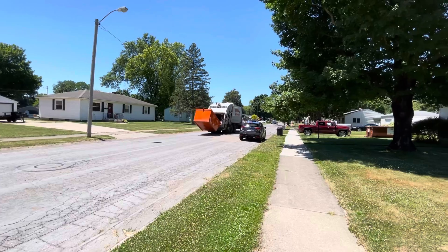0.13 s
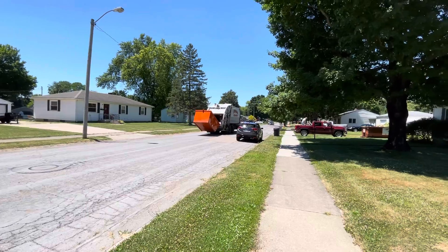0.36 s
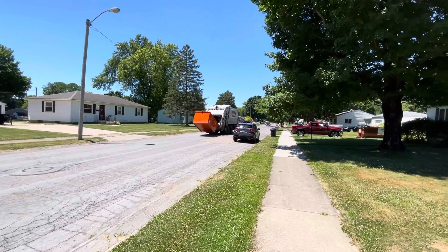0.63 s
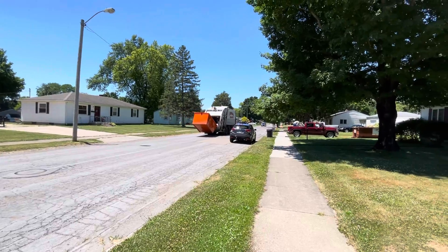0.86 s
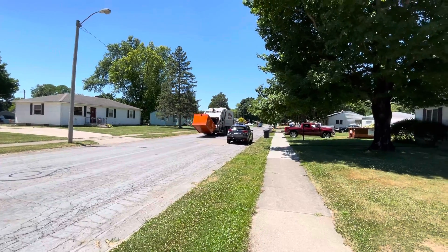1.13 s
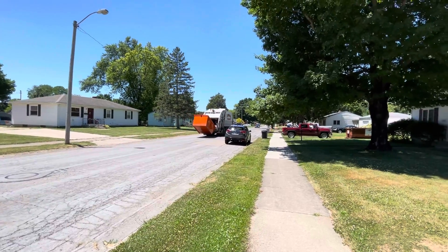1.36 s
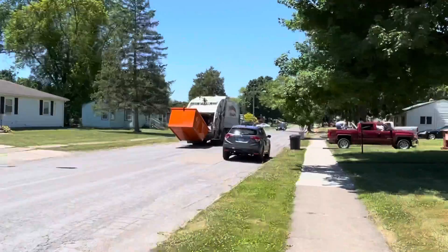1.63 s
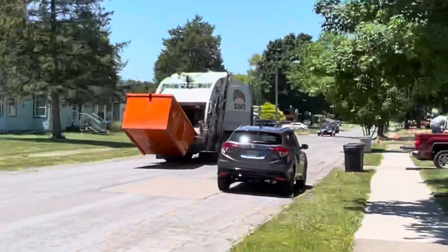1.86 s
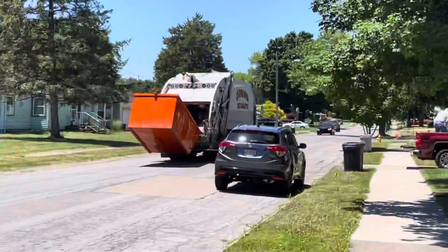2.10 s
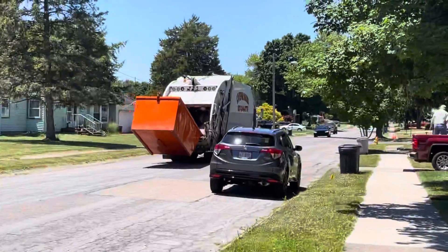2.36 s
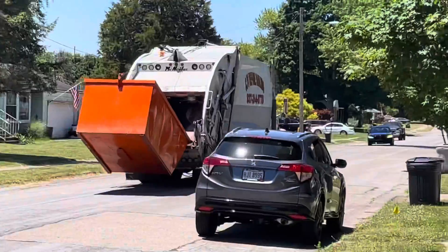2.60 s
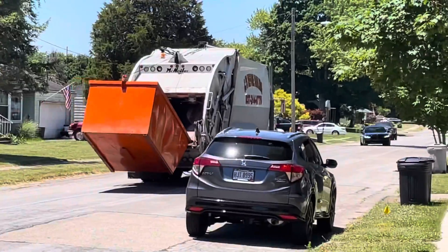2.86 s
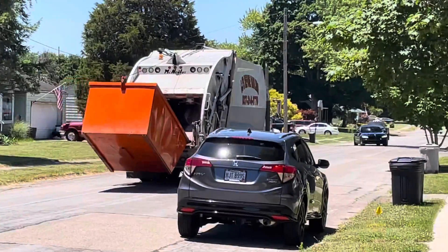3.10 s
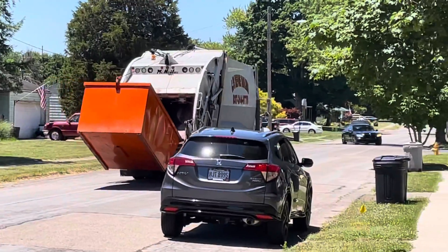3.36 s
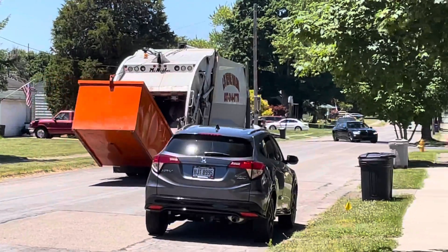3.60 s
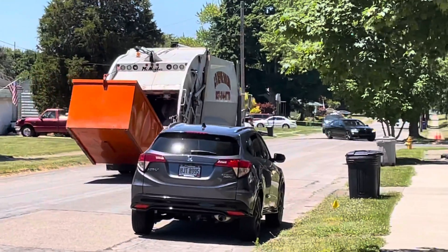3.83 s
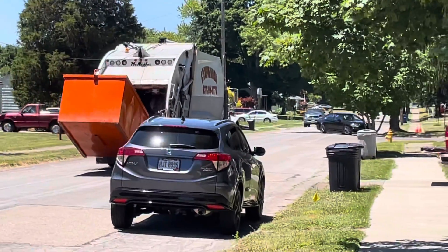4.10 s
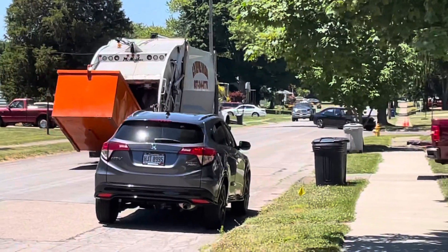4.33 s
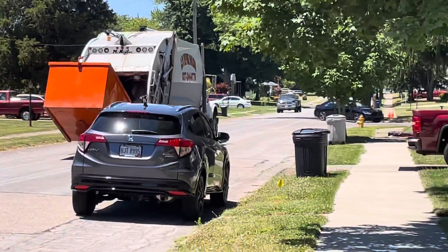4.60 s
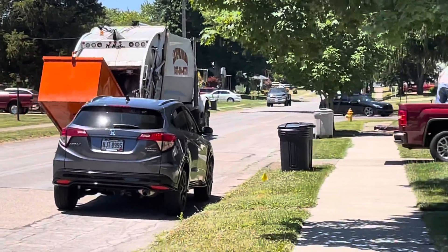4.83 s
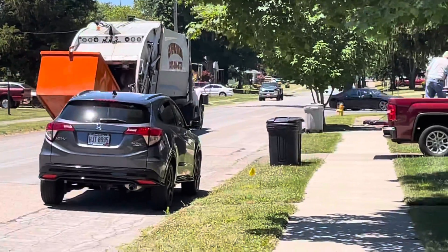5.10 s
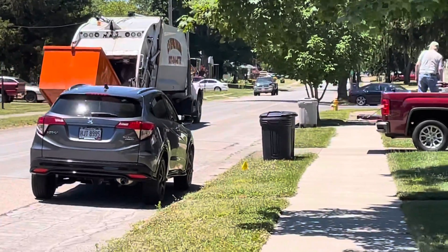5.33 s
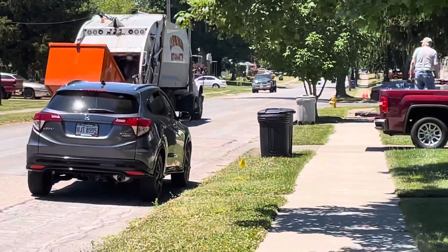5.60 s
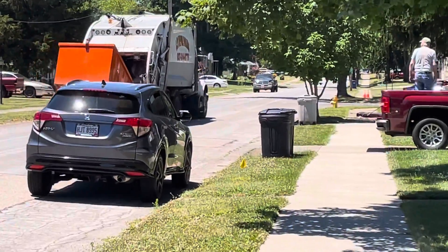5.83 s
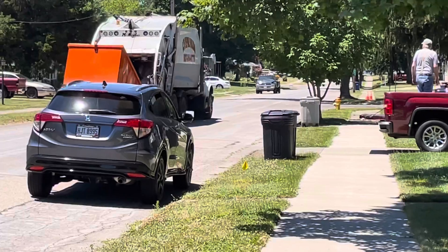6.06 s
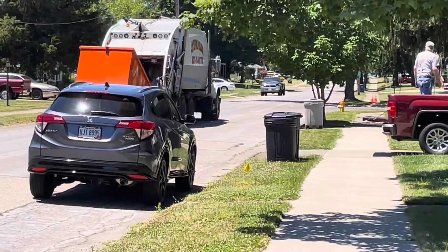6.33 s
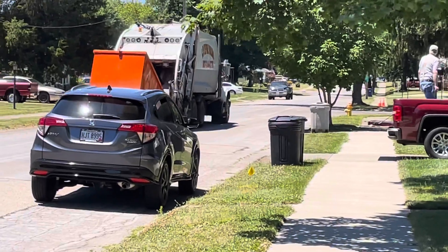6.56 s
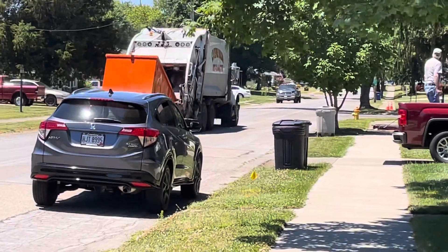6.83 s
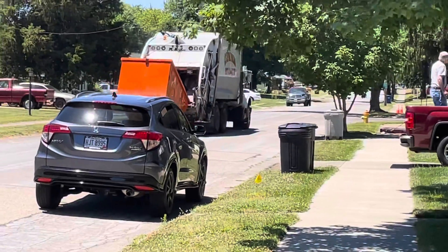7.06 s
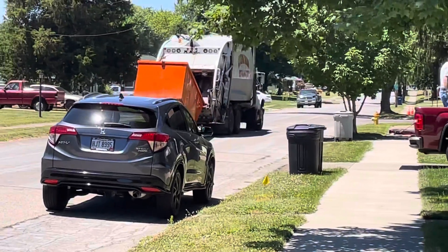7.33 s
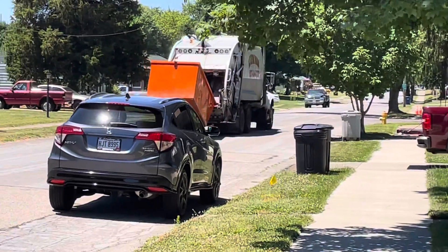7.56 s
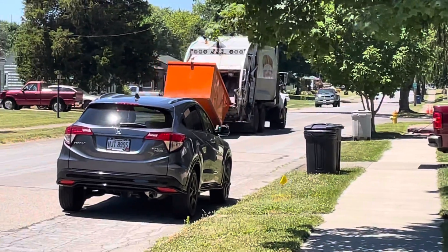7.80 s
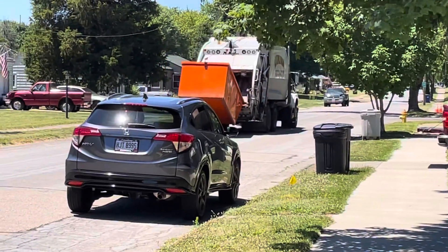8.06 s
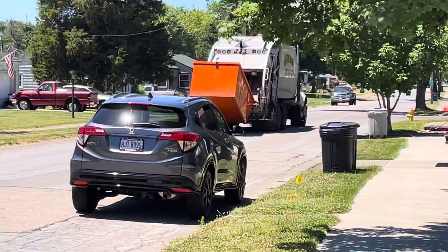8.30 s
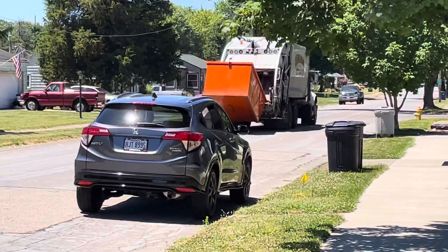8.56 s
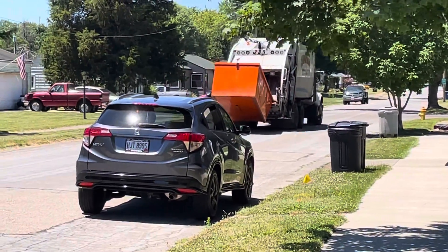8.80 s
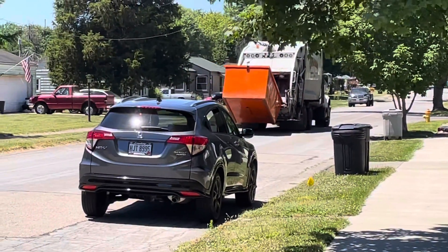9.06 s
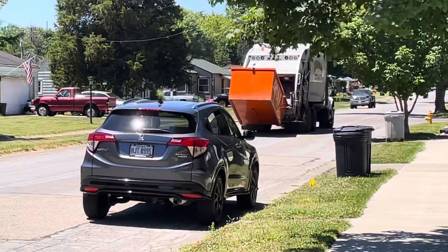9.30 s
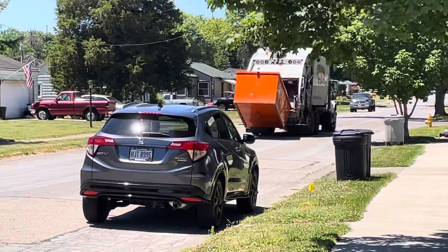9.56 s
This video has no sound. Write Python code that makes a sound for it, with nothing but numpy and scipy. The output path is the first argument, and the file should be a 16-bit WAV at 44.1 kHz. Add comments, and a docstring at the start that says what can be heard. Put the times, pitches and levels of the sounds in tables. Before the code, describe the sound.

Outdoors on a residential street, a heavy refuse truck pulls away with a steady low diesel drone, gear whine, rumble and broad airy hiss. A soft breath of brake air swells around two seconds and fades. Low wind buffets the handheld stereo microphone, small hoarse bird-like chirps come from afar, and faint dry finger ticks cluster past the middle. The pitch creeps upward as the truck slowly weakens.

```python
"""Refuse truck droning away

A heavy refuse truck drones away down a residential street: sines locked to the crankshaft make the exhaust
firing tone and gear whine, a free sine hums, and shaped noise makes rumble, growl, roar, cooling-air hiss,
a narrow hiss band and a breath of brake air. Noise lumps buffet like wind, short sines make far chirps and a
few faint high squeaks, noise bursts tick like fingers on the camera; its zoom recolours centre and sides."""
import sys
import numpy as np
from scipy import signal
from scipy.fft import rfft, irfft, next_fast_len
from scipy.io import wavfile
from scipy.ndimage import uniform_filter1d, map_coordinates

SR = 44100
rng = np.random.default_rng(int(sys.argv[2]) if len(sys.argv) > 2 else 0)


def digitize_waveform(pressure):
    """Quantize a signal to 16-bit integers and store it at the path in sys.argv[1].

    Rows of a 2-D input are taken as channels; values are limited to [-1, 1].
    """
    field = np.atleast_2d(pressure).T
    bounded = np.clip(field, -1, 1)
    quanta = np.round(bounded * 32767).astype(np.int16)
    wavfile.write(sys.argv[1], SR, quanta)


def volts(x):
    """Linear amplitude factor 10**(x/20) for a level x in dB, scalar or array-like."""
    e = np.asarray(x, float) / 20
    return 10 ** e


N = 426447

# crankshaft speed: (time [s], speed [turns/s])
SHAFT_SPEED = [(0, 20.83), (.28, 21.3), (.45, 21.2), (.7, 20.35), (1.6, 20.54), (2.0, 20.38), (2.4, 20.5),
               (2.8, 20.99), (4.0, 21.73), (4.8, 21.7), (5.2, 21.91), (6.0, 21.93), (6.4, 22.17),
               (7.2, 22.11), (7.6, 22.34), (8.0, 22.4), (8.4, 22.67), (9.2, 22.9), (9.67, 22.68)]
# exhaust firing tone before its fades: (time [s], level [dB])
FIRING_LEVEL = [(0, -27), (.62, -23), (.98, -25.5), (1.75, -20.5), (2.1, -23), (2.35, -25.5), (3.05, -28),
                (3.25, -22), (4.2, -22.5), (4.38, -25.5), (4.6, -24), (5.2, -23), (5.4, -29.5),
                (5.9, -24.5), (6.35, -34.5), (6.9, -29), (7.15, -25), (7.7, -32.5), (8.0, -31.5),
                (8.15, -25), (8.8, -26.5), (9.0, -25), (9.67, -30)]
# each tone fades or swells for a moment, as if its echoes met it out of or in step:
# {tone: (middle [s], half length [s], change [dB])}
TONE_FADES = {"firing": [(3.35, 0.026, -11.5), (2.9, 0.047, -3), (5.45, .02, -8), (6.26, .04, -12),
              (7.245, 0.018, -14), (8.0, 0.022, -7), (9.42, 0.073, -5), (8.2, 0.024, -6), (6.74, 0.15, -16),
              (5.6, 0.021, -6), (8.8, 0.04, -2)], "octave": [(.9, 0.25, -25), (1.9, 0.17, -15),
              (2.55, 0.17, -2.5), (3.1, 0.47, 0.5), (4.0, 0.11, -9.5), (5.2, 0.13, -3), (5.9, 0.35, 3),
              (6.7, 0.15, -15), (7.7, 0.14, 6), (8.4, .3, -6), (9.4, 0.44, -8)], "pump": [(.25, 0.31, 7.5),
              (1.0, 0.14, 12), (1.5, .15, -6), (2.0, 0.16, -2), (4.05, 0.29, 10.5), (4.55, 0.36, 11.5),
              (5.3, 0.48, 16.5), (5.9, 0.32, 15), (7.0, 0.17, 10), (7.5, 0.25, 14), (8.35, 0.12, 10.5)],
              "gear": [(0.062, 0.07, -6), (.44, 0.055, -18), (0.28, .15, 3), (2.08, 0.42, -3),
              (4.38, .2, 3.5), (5.0, 0.17, -7), (6.03, 0.61, -14.5), (5.95, .12, -19), (8.5, 0.49, -7),
              (9.5, 0.66, -10.5)]}
# faint overtones and gear mesh: (multiple of the crankshaft speed)
FAINT_ORDERS = [5, 6.5, 7, 7.5, 9, 13, 17, 20, 22, 23.44, 27, 30, 35.16, 40, 60, 67.9, 70, 100]
# usual strength of each faint order: (level [dB])
FAINT_LEVELS = [-50, -52, -50, -54, -57.5, -62, -62, -62, -64, -59, -66, -61, -66, -63, -67, -66, -65, -70]
# a faint order stands out for a while: {multiple: (middle [s], half length [s], rise [dB])}
FAINT_SWELLS = {"5": [(3.0, .3, 5), (5.1, 0.35, 11)], "6.5": [(.5, .4, 9), (3.3, .7, 10), (5.6, .4, 8)],
                "7": [(.6, 0.22, 7), (2.8, .4, 6), (4.4, .5, 9), (6.0, 0.25, 8), (8.6, 0.27, 5)],
                "7.5": [(3.3, .6, 10), (8.6, .4, 6)], "9": [(2.3, .6, 3), (4.8, .5, 6)],
                "13": [(.5, .7, 10)], "17": [(3.2, .9, 9), (4.8, .4, 7)], "20": [(6.6, 0.86, 8)],
                "22": [(7.9, .6, 11)], "30": [(.6, .7, 6), (3, .7, 5)], "35.16": [(2.8, .5, 12)],
                "40": [(.8, .5, 4), (2.8, .6, 9)], "60": [(2.0, 0.76, 8), (6.4, 0.49, 6)],
                "67.9": [(2.4, .5, 5), (7.4, .5, 9)], "70": [(3.2, .4, 9), (5.5, 0.65, 6)],
                "100": [(2.3, .1, 12), (2.78, .04, 22), (2.92, .12, 21)]}
# low hum off the engine's rhythm: (time [s], pitch [Hz], level [dB])
HUM_COURSE = [(0, 88, -42), (.6, 88, -37), (1.6, 88, -35), (1.9, 87.5, -32.5), (2.7, 86, -38),
              (3.4, 88, -28.5), (4.3, 89, -35), (4.9, 89.5, -36.5), (5.2, 89.5, -60), (9.67, 89.5, -61)]
# wind buffeting between gusts: (time [s], level [dB])
WIND_LEVEL = [(0, -45), (1.6, -42.5), (2.6, -38.5), (5.5, -38), (6.6, -36), (8, -35.5), (9.67, -36)]
# gusts: (middle [s], half length [s], rise [dB])
WIND_GUSTS = [(1.78, .06, 6), (2.23, 0.061, 4.5), (2.95, 0.12, 5.5), (3.4, 0.18, 8), (4.07, 0.066, 10),
              (4.47, .1, 3.5), (5.33, 0.31, 10), (5.85, 0.081, 8), (6.36, 0.12, 7), (7.25, 0.2, 2.5),
              (9.0, 0.21, 3.5), (9.43, 0.063, 1.5)]
# how hard the engine works: (time [s], effort [dB])
ENGINE_EFFORT = [(0, 0.5), (.5, -2.5), (1.5, -3), (1.8, -0.5), (2.8, 1.5), (3.6, 0.5), (4.8, -1), (5.3, -1),
                 (5.9, -1), (6.4, 0), (7.7, -.5), (9.1, 0), (9.67, -1.5)]
# the thin top air is stronger at first: (middle [s], half length [s], rise [dB])
AIR_SWELL = [(.1, .25, 3.5)]
# noise colours, all: (frequency [Hz], relative density [dB])
BUFFET_COLOUR = [(18, -120), (26, -25.5), (38, -8.5), (50, -2), (75, -1), (110, -4), (160, -31),
                 (250, -120)]
RUMBLE_COLOUR = [(35, -120), (60, -12), (80, -7), (105, -4), (140, -0.5), (190, -6.5), (225, -9),
                 (260, -10.5), (330, -20), (450, -120)]
GROWL_COLOUR = [(200, -120), (280, -5), (356, -0.5), (410, -5.5), (500, -4), (680, -6.5), (800, -12),
                (1100, -64.5), (1500, -120)]
ROAR_COLOUR = [(450, -120), (650, -13), (780, -2), (950, -2), (1160, -4), (1510, -4), (1750, -7),
               (1950, -12), (2500, -41.5), (4000, -120)]
HISS_COLOUR = [(1060, -32.5), (1800, -4.5), (2150, 2), (2520, -3.5), (3610, -7.5), (5550, -16),
               (6370, -17.5), (6800, -30), (7100, -38), (9360, -62), (15800, -120)]
AIR_COLOUR = [(5000, -120), (6800, 1.5), (7600, -3), (9300, -0.5), (10300, -2.5), (11500, -5.5),
              (12100, -7.5), (12500, -17), (13100, -33), (16000, -66)]
TICK_COLOUR = [(2000, -120), (4000, -26), (6500, -8), (8000, -5.5), (9000, -7), (10000, -7), (12000, -8.5),
               (13500, -15.5), (16000, -30)]
BRAKE_COLOUR = [(1800, -61), (2600, -8.5), (3300, 1), (4300, -2.5), (5500, -6.5), (6500, -19),
                (7200, -51.5)]
# narrow band of hiss, a rising whistle at first, later a steady edge near 6.5 kHz:
# (time [s], centre [Hz], level [dB])
HISS_BAND_COURSE = [(0, 5700, -63), (.22, 5950, -62), (.55, 6100, -70), (1.6, 6500, -73), (1.9, 5350, -64),
                    (2.4, 5550, -62), (3.1, 5950, -65.5), (4, 6300, -71), (6, 6500, -71), (9.67, 6550, -68)]
# chirps and a few faint high squeaks: (time [s], length [s], start pitch [Hz], end pitch [Hz], level [dB])
CHIRPS = [(0.027, 0.038, 5000, 4530, -53), (0.075, 0.047, 3810, 3160, -48), (0.452, .05, 4630, 3780, -55),
          (0.63, .03, 5100, 4300, -56), (0.668, 0.03, 3700, 3450, -46), (1.31, 0.045, 5040, 4830, -56),
          (1.696, 0.056, 10400, 10400, -70), (2.09, 0.064, 4880, 4020, -51),
          (2.314, 0.043, 5300, 3180, -49), (2.46, .04, 3000, 4000, -57), (3.89, .04, 3650, 3500, -54),
          (4.05, 0.049, 4480, 4520, -50), (4.072, 0.046, 3550, 3220, -49), (5.387, 0.058, 5200, 3400, -54),
          (5.984, 0.058, 5760, 3340, -48), (6.038, .03, 3550, 4600, -54), (6.4, .04, 5000, 4400, -57),
          (6.942, .05, 4630, 3670, -57), (7.227, 0.058, 4660, 4590, -48), (7.242, .035, 10600, 10300, -73),
          (7.49, .04, 5100, 4200, -58), (8.18, .05, 9450, 9300, -75), (8.22, 0.057, 6630, 6400, -56),
          (8.25, .03, 4200, 3500, -51), (8.81, 0.058, 4600, 3700, -56), (8.866, 0.058, 3880, 3300, -51),
          (9.567, 0.074, 3840, 3300, -52), (9.594, 0.062, 4400, 3920, -58)]
# finger ticks: (time [s], level at the top of the swell [dB])
TICK_EVENTS = [(0.862, -78), (0.882, -78), (1.447, -72), (2.4294, -82), (4.5286, -75), (4.8683, -75),
               (5.281, -76), (5.3, -75), (5.33, -79), (5.3627, -74), (5.435, -78.5), (5.53, -78),
               (5.4, -75), (5.472, -72), (5.4959, -75), (5.5694, -79), (5.7359, -78), (5.9279, -78.5),
               (6.57, -78.5), (6.6194, -79), (6.72, -76.5), (7.48, -80.5), (8.0706, -81), (8.4736, -75)]
# stereo width of the noises: (frequency [Hz], left-right likeness [0 to 1])
LIKENESS = [(60, 0.86), (120, 0.94), (230, 1), (460, 0.53), (910, 0.41), (1800, 0.29), (3550, 0.22),
            (7010, 0.12)]
# balance of the microphones: (frequency [Hz], left minus right [dB])
MIC_LEAN = [(60, -1.5), (160, -0.5), (400, -0.5), (1040, 2.5), (2710, -0.5), (7010, 0.5)]
# colour of centre and sides before the zoom: (frequency [Hz], gain [dB])
EARLY_COLOUR = [(60, -0.5), (300, -3.5), (385, -6.5), (480, -4.5), (640, 4.5), (820, 0), (920, -1.5),
                (1200, 4), (1400, -2), (1800, 0.5), (3500, -2.5), (6000, 3.5), (6900, 8.5), (7500, 11.5),
                (8300, 0), (9300, 1.5), (11000, 1.5)]
# side gain in the later part, weak at 2 to 6 kHz, strong near 7 to 8 kHz: (frequency [Hz], gain [dB])
LATER_SIDE_GAIN = [(60, -9.5), (250, -2.5), (1400, -4), (2000, -4), (2300, -21.5), (3300, -24.5),
                   (3700, -50.5), (5900, -38.5), (6500, -6), (7000, 11), (7600, 14), (8600, 6.5),
                   (9600, -1.5), (10300, -8.5), (10800, -27.5)]


def unit(x):
    """Scales to rms 1."""
    return x / np.sqrt(np.mean(x ** 2) + 1e-20)


def along(points, hz):
    """Reads (frequency [Hz], value) points on a log frequency axis."""
    f, v = np.transpose(points)
    return np.interp(np.log(hz + 1), np.log(f + 1), v)


def curves(rows):
    """One value per sample for each column after the time."""
    s, *cols = np.transpose(rows)
    return [np.interp(np.arange(N) / SR, s, c) for c in cols]


def swells(rows):
    """Bell-shaped changes in dB, summed."""
    t = np.arange(N) / SR
    return sum(db * np.exp(-((t - s) / half) ** 2) for s, half, db in rows)


def wobble(rate):
    """A smooth random curve, rate knots a second."""
    return map_coordinates(rng.standard_normal(int(N * rate / SR) + 4), [np.arange(N) * rate / SR])


def filtered(x, response):
    """x times a response of frequency."""
    m = next_fast_len(N + 8192)
    return irfft(rfft(x, m) * response(np.fft.rfftfreq(m, 1 / SR)), m)[..., :N]


def rush(colour, patchy_db):
    """Stereo noise, mid rms 1, with short patches and long narrow bands of random gain (echoes interfering)."""
    z = signal.stft(rng.standard_normal((2, N)), nperseg=1024)[2]

    def smooth(bins, frames):
        across = uniform_filter1d(rng.standard_normal(z.shape[1:]), size=bins, axis=0)
        return unit(uniform_filter1d(across, size=frames, axis=1))

    def mid_and_side(hz):
        turn = np.arccos(np.clip(along(LIKENESS, hz), -1, 1)) / 2
        return volts(along(colour, hz)) * np.array([np.cos(turn), np.sin(turn)])

    field = 0.6 * smooth(bins=8, frames=12) + 0.55 * smooth(bins=3, frames=70)
    pair = signal.istft(z * volts(patchy_db * field), nperseg=1024)[1][:, :N]
    mid, side = filtered(pair, mid_and_side)
    return np.array([mid + side, mid - side]) / np.std(mid)


def tone(hz, db, drift, flutter_db, spread):
    """A sine with unsteady phase and level; the two ears hear it at slowly wandering phases."""
    phase = 2 * np.pi * np.cumsum(hz) / SR + rng.uniform(0, 2 * np.pi)
    phase += drift * wobble(9)
    apart = spread * (1 + 0.3 * wobble(1.0))  # radians either way
    level = np.sqrt(2) * volts(db + flutter_db * wobble(7))
    return level * np.sin(phase + [apart, -apart])


def engine():
    """Firing tone, pump and gears all turn with the crankshaft; among the faint orders the high drift most."""
    shaft_hz, = curves(SHAFT_SPEED)
    firing_db = curves(FIRING_LEVEL)[0] + swells(TONE_FADES["firing"])
    # three firings a turn
    out = tone(3 * shaft_hz, firing_db, drift=0.06, flutter_db=0.5, spread=0.07)
    # (name, multiple of the crankshaft speed, (start, end) level in dB before the fades)
    strong_orders = [("octave", 6, (-31.5, -45)), ("pump", 10, (-50, -55)), ("gear", 11.72, (-34, -36))]
    narrowing = np.linspace(0.24, 0.09, N)
    for name, order, ends_db in strong_orders:
        level_db = np.linspace(*ends_db, N) + swells(TONE_FADES[name])
        out += tone(order * shaft_hz, level_db, drift=0.064, flutter_db=1.16, spread=narrowing)
    for order, db in zip(FAINT_ORDERS, FAINT_LEVELS):
        level_db = db + swells(FAINT_SWELLS.get(str(order), [])) + 1.8 * wobble(1.215)
        out += tone(order * shaft_hz, level_db, drift=0.02 * order, flutter_db=2.0, spread=0.35)
    return out


def hum():
    """A low hum, nearly steady in pitch, that comes and goes."""
    return tone(*curves(HUM_COURSE), drift=0.13, flutter_db=1.0, spread=0.1)


def wind():
    """Low noise that buffets in lumps and swells with each gust."""
    level_db = curves(WIND_LEVEL)[0] + swells(WIND_GUSTS) + 1.1 * wobble(8)
    return volts(level_db) * rush(BUFFET_COLOUR, patchy_db=0.8)


def truck_noises():
    """Five bands of noise from rumble to thin air follow the engine's effort and fade with distance."""
    effort_db, = curves(ENGINE_EFFORT)
    t = np.arange(N) / SR

    def law(start_db, loss_db_per_s, effort_share):
        return volts(start_db - loss_db_per_s * t + effort_share * effort_db)

    rumble = law(-32, 0.74, 0.19) * volts(0.6 * wobble(5)) * rush(RUMBLE_COLOUR, patchy_db=1.2)
    growl = law(-40.5, 0.42, 0.48) * rush(GROWL_COLOUR, patchy_db=0.7)
    roar = law(-43, 0.55, 0.95) * rush(ROAR_COLOUR, patchy_db=1.23)
    hiss = law(-48, 0.039, 0.82) * rush(HISS_COLOUR, patchy_db=1.93)
    flicker = volts(0.8 * wobble(16) + swells(AIR_SWELL))
    air = law(-75.5, 0.49, 0.8) * flicker * rush(AIR_COLOUR, patchy_db=1.5)
    return rumble + growl + roar + hiss + air


def hiss_band():
    """Narrow noise riding on a moving centre, unsteady, different in each ear."""
    centre_hz, db = curves(HISS_BAND_COURSE)
    # slow noise on a carrier and its quadrature becomes a narrow band around the centre
    smear = filtered(rng.standard_normal((2, 2, N)), lambda hz: np.exp(-(hz / 260) ** 2))
    phase = 2 * np.pi * np.cumsum(centre_hz) / SR
    band = unit(smear[0] * np.cos(phase) + smear[1] * np.sin(phase))
    return volts(db + 1.5 * wobble(6)) * band


def chirps():
    """Short hoarse chirps, mostly gliding, and a few faint high squeaks, each smeared by a short echo tail."""
    out = np.zeros((2, N + SR))
    waver = wobble(450)  # fast pitch jitter makes them hoarse
    pans_db = 3 * rng.standard_normal(len(CHIRPS))  # left minus right
    echo_s = np.arange(6000) / SR
    for (s, length, start_hz, end_hz, db), pan_db in zip(CHIRPS, pans_db):
        start = round(s * SR)
        u = np.linspace(0, 1, round(length * SR))
        pitch_hz = start_hz + (end_hz - start_hz) * u + 200 * waver[start:][:len(u)]
        note = np.sin(np.pi * u) * np.sin(2 * np.pi * np.cumsum(pitch_hz) / SR)
        echo = rng.standard_normal((2, 6000)) * volts(-60 * echo_s / 0.083)  # 60 dB down in 83 ms
        wet = signal.fftconvolve(note[None], volts(-2) * echo / np.linalg.norm(echo[0]), axes=1)
        wet[:, :len(u)] += 0.8 * note
        out[:, start:][:, :wet.shape[1]] += volts(db + np.array([[pan_db], [-pan_db]]) / 2) * wet
    return out[:, :N]


def ticks():
    """Faint dry ticks and rustles on the camera body: gritty treble noise that swells and dies fast."""
    envelope = np.zeros(N + SR)
    u = np.arange(SR // 4) / SR / 0.011  # each peaks after 11 ms
    for s, db in TICK_EVENTS:
        envelope[round(s * SR):][:len(u)] += volts(db) * u * np.exp(1 - u)
    grit = volts(2.1 * wobble(150)) * rush(TICK_COLOUR, patchy_db=1.5)[0]
    return envelope[:N] * grit * np.ones((2, 1))


def brake():
    """Air bleeds off the brakes: a soft swell of bright noise that dies away."""
    start_s, rise_s, fall_s, peak_db = 1.41, 0.63, 0.91, -52
    t = np.clip(np.arange(N) / SR - start_s, 0, None)
    shape = (1 - np.exp(-(t / rise_s) ** 2)) * np.exp(-(t / (rise_s + fall_s)) ** 2)
    return volts(peak_db) * shape / shape.max() * rush(BRAKE_COLOUR, patchy_db=2.5)


def scene():
    """Truck, wind, street and handling, summed."""
    return engine() + hum() + wind() + truck_noises() + hiss_band() + chirps() + ticks() + brake()


def roll_off(x):
    """The treble ends steeply here."""
    return signal.sosfilt(signal.butter(12, 12900, fs=SR, output="sos"), x)


def record(dry):
    """The microphones lean with frequency; the zoom changes the colour of centre and sides."""
    signs = np.array([[1], [-1]])
    left, right = filtered(dry, lambda hz: volts(along(MIC_LEAN, hz) / 2 * signs))
    mid, side = (left + right) / 2, (left - right) / 2
    # crossfade of 0.24 s centred on 1.7 s
    later = np.clip((np.arange(N) / SR - 1.7) / 0.24 + 0.5, 0, 1)
    early_gain = lambda hz: volts(along(EARLY_COLOUR, hz))
    later_side_gain = lambda hz: volts(along(LATER_SIDE_GAIN, hz))
    mid = (1 - later) * filtered(mid, early_gain) + later * mid
    side = (1 - later) * filtered(side, early_gain) + later * filtered(side, later_side_gain)
    return roll_off(np.array([mid + side, mid - side]))


dry = scene()
out = record(dry)
digitize_waveform(out)
```